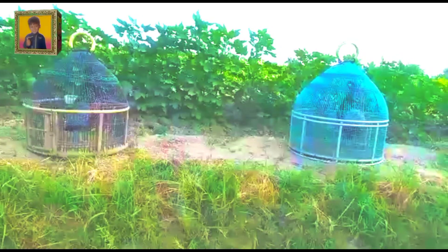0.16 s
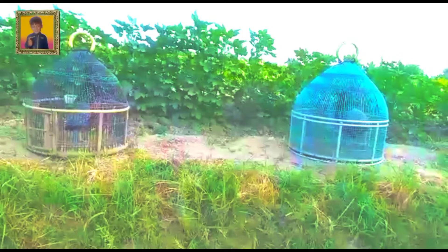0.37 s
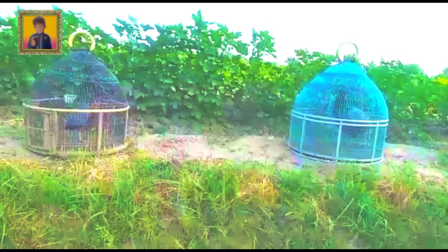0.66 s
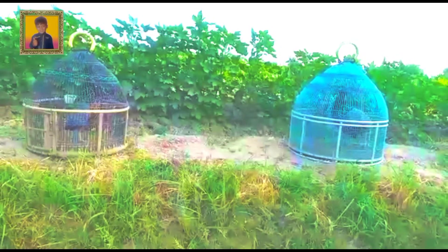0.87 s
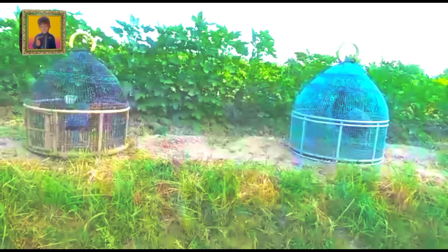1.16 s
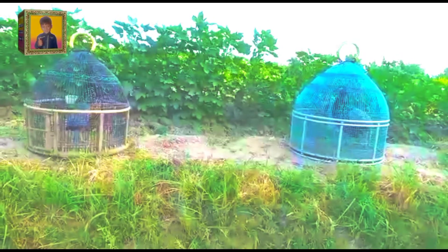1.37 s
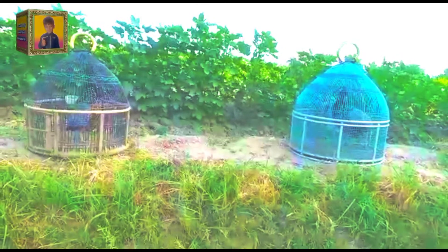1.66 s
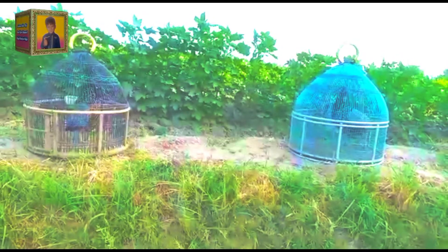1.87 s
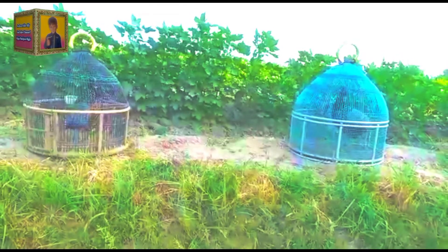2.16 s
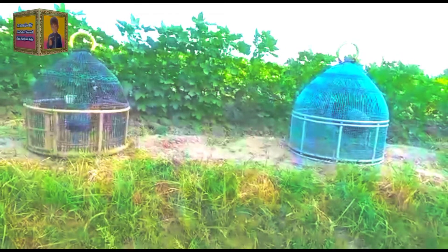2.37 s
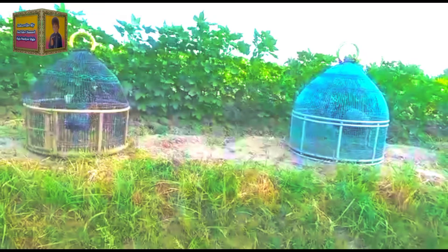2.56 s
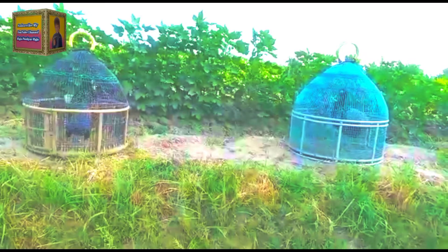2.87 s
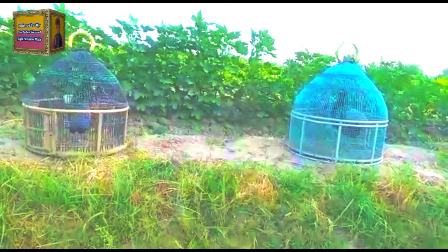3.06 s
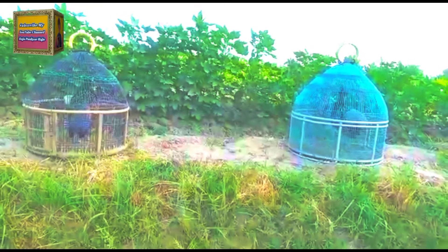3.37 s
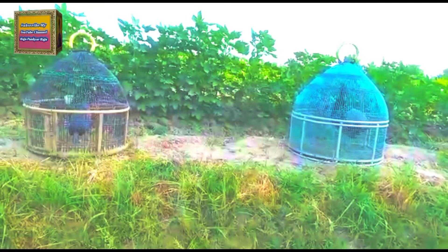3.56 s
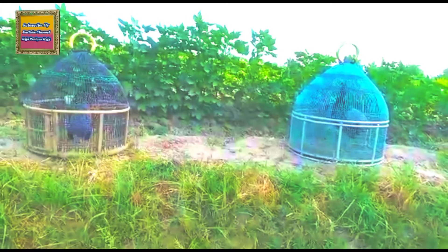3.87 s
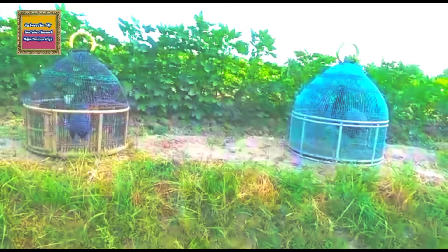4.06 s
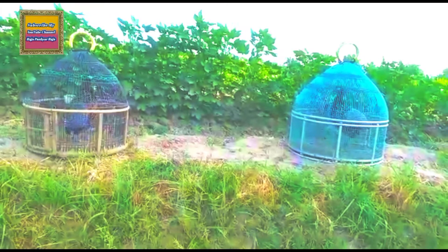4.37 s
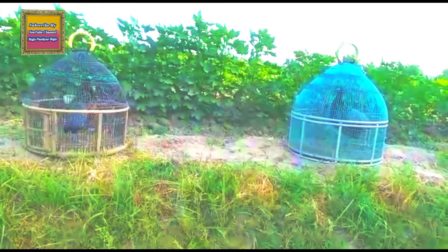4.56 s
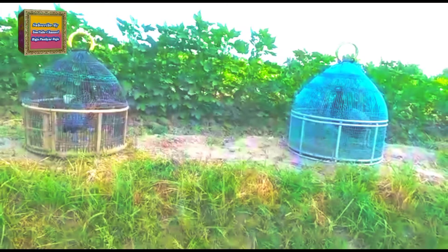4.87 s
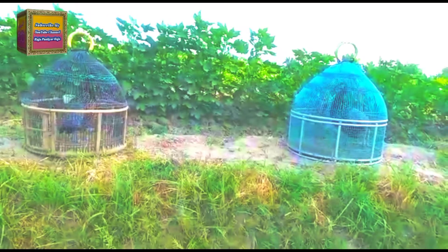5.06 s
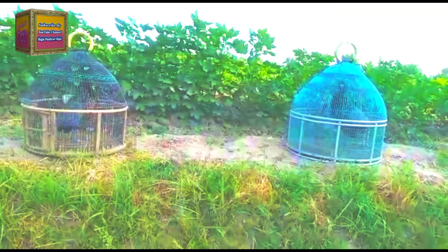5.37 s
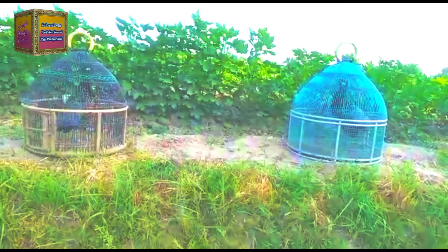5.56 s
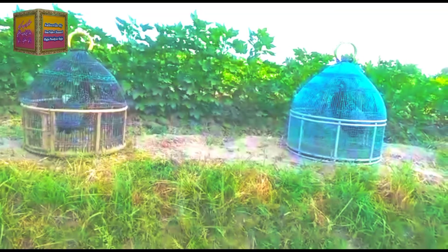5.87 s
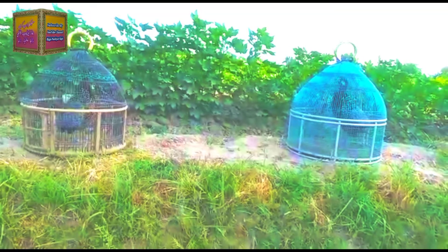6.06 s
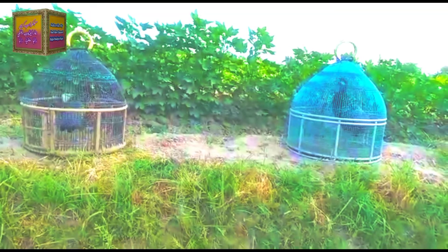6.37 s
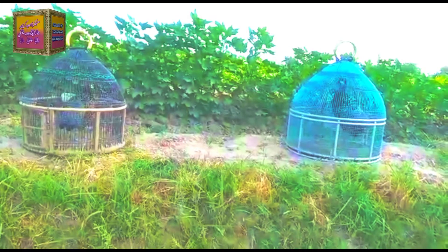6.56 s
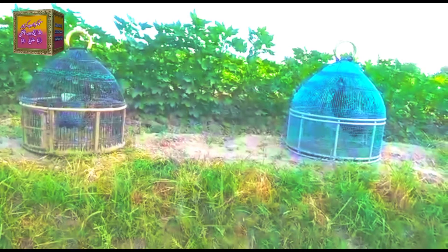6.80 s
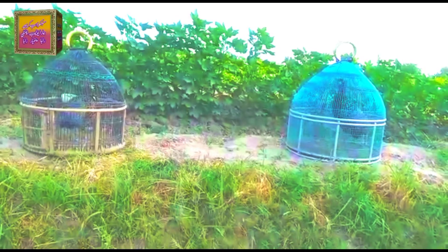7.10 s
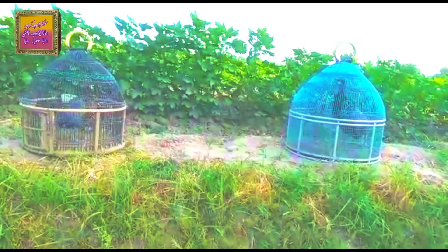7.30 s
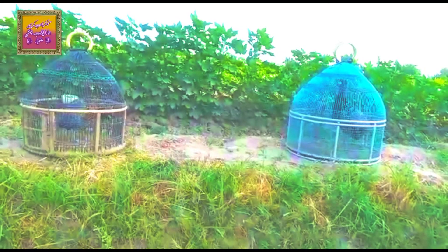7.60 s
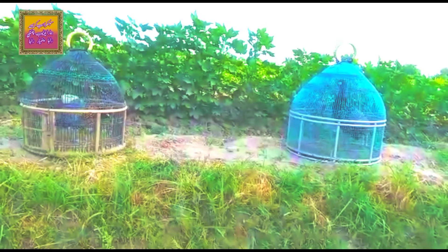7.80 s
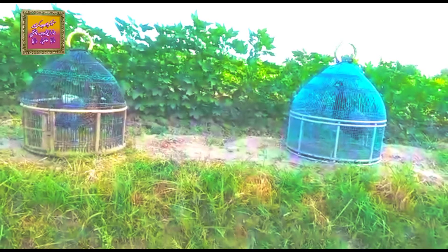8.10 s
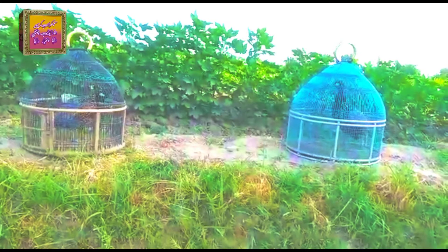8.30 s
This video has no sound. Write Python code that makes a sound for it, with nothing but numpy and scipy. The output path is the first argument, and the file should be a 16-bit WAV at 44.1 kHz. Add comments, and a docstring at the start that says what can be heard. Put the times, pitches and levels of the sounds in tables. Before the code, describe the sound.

Open field, close microphone. Low steady rumble and faint hiss, with a soft warbling distant bird early on. After two seconds a caged francolin snaps out a chirp leaping into a high whistle, then harsh rattling trills with short whistles between. About a second later another caged bird answers with the same pattern, higher and thinner. Small wind thumps touch the microphone during the first call; the background sinks under the calls and slowly returns.

```python
"""Two caged francolins call in turn in a field: a chirp, a held whistle, then grating trills with
short whistles between. Chirp, whistle and trill are one near-sinusoidal syrinx under different
pitch control; a trill is frequency modulation, the pitch dragged down 200 to 330 times a second.
Far birds are pairs of warbling voices; rumble, hiss, hums and wind puffs are filtered noise.
An automatic gain control lifts the quiet stretches, yields to each call and creeps back."""
import sys
import numpy as np
from scipy import signal
from scipy.io import wavfile
from scipy.ndimage import uniform_filter1d, minimum_filter1d

SR = 44100
rng = np.random.default_rng(int(sys.argv[2]) if len(sys.argv) > 2 else 0)


def generate_wav(signal):
    """Clip the signal to [-1, 1] and save it as 16-bit WAV at the path in sys.argv[1]."""
    frames = np.transpose(np.atleast_2d(signal))
    scaled = np.clip(frames, -1, 1) * 32767
    pcm = np.round(scaled).astype(np.int16)
    wavfile.write(sys.argv[1], SR, pcm)


N = 372197

# Spectrum of the distant rumble and hiss, relative. Columns: frequency_hz, density_db (per Hz)
FIELD_SPECTRUM = [(25, -23), (53, 2.5), (157, 2), (284, -8), (352, -14.5), (437, -21.5), (604, -27.5),
                  (1120, -34.5), (1550, -35), (2260, -37), (3130, -43.5), (8730, -53), (14600, -45.5),
                  (15800, -46.5)]
FIELD_DB = -43.5  # rms level

# Wind puffs on the microphone, level before the envelope. Columns: start_s, level_db
WIND_PUFFS = [(1.053, -41.5), (3.062, -34.5), (3.091, -30.5), (3.336, -22), (3.379, -20), (3.444, -21.5),
              (3.489, -26), (3.83, -30.5), (4.178, -36), (4.535, -36)]
# Spectrum of a puff, relative. Columns: frequency_hz, density_db (per Hz)
PUFF_SPECTRUM = [(30, -22.5), (70, -7), (130, -1.5), (250, -12.5), (420, -23.5), (700, -44), (1200, -78)]
PUFF_DECAY_S = 0.0457  # time for a puff to fall to 1/e

# Faint wavering tones and bands; width is that of the narrower filter.
# Columns: start_s, end_s, centre_hz, width_hz, level_db
HUM_BANDS = [(0, 8.44, 150, 12, -54), (1.93, 5.4, 237, 2.5, -50), (0, 8.44, 360, 4, -61.5),
             (4.8, 5.32, 105, 85, -44.5), (.95, 1.21, 1950, 60, -73), (0, 8.44, 3900, 480, -78),
             (7.55, 8.44, 1250, 640, -79.5), (2.33, 2.57, 3270, 50, -63), (7.03, 7.52, 2480, 70, -74),
             (7.03, 7.52, 3080, 90, -72), (7.55, 7.88, 1190, 40, -74), (8.1, 8.44, 1200, 25, -72)]

# Far birds, level before the fade. Columns: start_s, length_s, start_hz, end_hz, width_hz, level_db
FAR_BIRD_CALLS = [(0.0, 0.064, 2140, 2080, 302, -70.5), (0.194, 0.062, 2200, 2360, 300, -65),
                  (0.398, .08, 2170, 2030, 402, -65.5), (.35, 0.07, 1144, 1144, 80, -68),
                  (0.658, 0.062, 2487, 2350, 300, -71), (0.875, 0.036, 2300, 1780, 300, -65),
                  (1.199, 0.34, 2041, 1862, 647, -50), (1.504, .22, 1913, 1770, 411, -67.5),
                  (5.128, 0.1, 4293, 5347, 150.8, -74), (8.13, 0.03, 4500, 5200, 300, -72),
                  (8.165, 0.032, 5350, 4900, 302, -71), (8.22, .025, 4360, 5000, 300, -77),
                  (8.247, .05, 5050, 4950, 300, -73), (1.109, 0.05, 1320, 1086, 300, -64)]
FAR_WARBLES_PER_S, FAR_SLOWING_PER_S = 84, .55  # starting warble rate; share of it lost per second
FAR_GAP, FAR_DEPTH = 0.29, 0.22  # shares of the width: half the gap between voices, warble depth
FAR_FADING_DB, FAR_BREATH_DB, FAR_OCTAVE_DB = -4.5, -6.5, -27.5  # fade by the end; breath; second harmonic

# Spectral colour of the near birds through beak, cage and microphone. Columns: frequency_hz, gain_db
NEAR_COLOUR = [(700, -36), (1100, -22.5), (1550, -9), (2300, -17.5), (2800, -2), (3400, -2), (4200, 4.5),
               (5100, -2), (6000, -16), (6600, -27), (7500, -28.5), (8600, -27), (9600, -20),
               (11000, -13.5), (13500, -12.5), (15500, -14)]

# Falling chirps, pitches before the sag; the last row is the other side of the syrinx.
# Columns: start_s, length_s, first_pitch_hz, last_pitch_hz, step_middle_s, step_time_s, level_db,
#          second_harmonic_db
CHIRP_NOTES = [(2.26, 0.038, 2796, 1846, .0065, 0.0019, -2.5, -13),
               (5.285, 0.031, 3048, 1756, .0135, .0024, -6.5, -16.5),
               (5.288, 0.018, 4130, 4300, .008, .001, -9.5, -18)]
CHIRP_SAG_PER_S = 5.5  # share of the pitch lost per second
CHIRP_ARCH_DB, CHIRP_EDGE_S, CHIRP_EDGE_DB = -7.5, 0.0033, -20  # arch at both ends; extra edge ramps

# Held whistles. Columns: start_s, hold_s, leap_from_hz, held_pitch_hz, level_db, second_harmonic_db,
#          snap_db (extra level of leap and collapse)
WHISTLE_NOTES = [(2.3, .027, 1484, 5853, -0.7, -15.5, -2.5), (3.32, 0.022, 5040, 6160, -8.5, -26, 5.7),
                 (3.924, 0.015, 5500, 6300, -9, -22.5, -2.2), (5.326, .0332, 1857, 7220, -9.5, -9, 6),
                 (6.305, 0.027, 6770, 7310, -14, -14.5, 2), (6.913, 0.02, 6840, 7100, -13.5, -9, 4)]
LEAP_S, DROP_S, DROP_HZ = 0.0017, 0.0012, 1500  # time constants of leap and collapse; pitch it falls to
LET_GO_S, LET_GO_DB = .011, -29.5  # length of the release and its level change

# Grating trills, one list a bird. Columns: start_s, length_s, level_db, swell_s,
#          sag_db (over the length), fade_s, first_dips_per_s, settled_dips_per_s (before slowing)
TRILL_NOTES = [
    [(2.801, 0.15, -7.5, .004, -3.2, 0.013, 257, 285), (3.14, .181, -8, 0.036, -3.5, 0.00097, 308, 284),
     (3.343, .025, -14.5, .002, -0.5, 0.022, 280, 270), (3.675, 0.1, -7, 0.038, -2.5, .018, 290, 268),
     (3.848, 0.08, -9, 0.032, -0.4, 0.0043, 280, 303), (3.941, .07, -9, .006, -2, 0.028, 280, 320)],
    [(5.784, 0.17, -8, 0.0047, -4, 0.024, 277, 258), (6.134, .171, -8, 0.0213, -5, .002, 320, 277),
     (6.327, .036, -15, .002, -1.5, .016, 220, 280), (6.657, 0.1, -9.5, .02, 0, 0.028, 290, 303),
     (6.826, 0.086, -7.5, 0.024, -2.5, .002, 270, 310), (6.93, 0.092, -9.5, 0.0028, -9.5, 0.011, 268, 330)],
]
# Each bird's voice. Columns: resting_pitch_hz (once tightened), lowest_pitch_hz (at full effort),
#          early_drop_hz (extra drop at the start), rebound (in mid-dip, at full effort, 0-1),
#          dip_share (of the cycle, 0-1), loud_half_width (of the cycle, 0-1),
#          loss_db (away from mid-dip), second_harmonic_db, third_harmonic_db,
#          breath_db (before the loudness swing), treble_db (from 12500 Hz up)
BIRD_VOICES = [(6044, 2749.5, 460, 0.83, 0.78, 0.33, -7, -14, -32.5, -18.5, -8.5),
               (7386, 3365, 600, 0.05, 0.76, 0.36, -9, -13.5, -14, -21, 1.5)]
SWELL_DB, FADE_DB = -16.5, -15  # change of level at the very start and the very end
SETTLE_S = .04  # time constant of the dip rate
SLOWING, SLOWING_LEAD = .17, 2.8  # share of the rate lost by the end; begins this many fades early
TIGHTEN_S = 0.065  # time constant of muscle tightening
LOOSE_START, LOOSE_WEAK = 0.12, 0.072  # shares lost from the resting pitch: at the start, at weak effort

# Single reflection off the other cage. Columns: delay_s, level_db
CAGE_ECHOES = [(0.0095, -14.5)]
# Tails of near scatter, hedge and far tree line, level before colouring. Columns: t60_s, level_db
SCATTER_TAILS = [(.1, -15.5), (.3, -29), (1.3, -45)]
BAND_EDGE_HZ = 15800  # upper limit of the whole sound


def gain_of(db):
    """Decibel law: 20 dB is a tenfold amplitude."""
    return 10 ** (np.asarray(db) / 20)


def evened(x):
    """Normalization of power to rms 1."""
    return x / np.sqrt(np.mean(x ** 2) + 1e-20)


def noise(n):
    """White noise: independent Gaussian samples, drawn in whole blocks."""
    return rng.standard_normal((n // 16384 + 1) * 16384)[:n]


def drift(n, size):
    """Random wander: noise averaged twice over size samples, at rms 1."""
    return evened(uniform_filter1d(uniform_filter1d(noise(n), size), size))


def add(mix, start_s, sound):
    """Superposition: pressures sum from the start time on."""
    part = mix[max(round(start_s * SR), 0):][:len(sound)]
    part += sound[:len(part)]


def shaped(x, points):
    """Minimum-phase filtering: a (Hz, dB) spectrum with the causal phase that belongs to it."""
    f, db = np.transpose(points)
    bins_hz = abs(np.fft.fftfreq(8192, 1 / SR)) + 1
    log_gain = np.log(gain_of(np.interp(np.log(bins_hz), np.log(f), db)))
    response = np.exp(np.conj(signal.hilbert(log_gain)))
    taps = np.fft.ifft(response).real[:4096]
    return signal.oaconvolve(x, taps)[:len(x)]


def resonate(x, hz, width):
    """Resonance by heterodyning: shift the pitch hz to zero, smooth, and shift back."""
    turn = np.exp(2j * np.pi * np.cumsum(hz * np.ones(len(x))) / SR)
    r = np.exp(-np.pi * width / SR)
    return 2 * (turn * signal.lfilter([1 - r], [1, -r], x / turn)).real


def field():
    """Random-phase noise: distant rumble and hiss, with levels wandering by patch and in the bass."""
    frames, hz = N // 256 + 5, np.fft.rfftfreq(1024, 1 / SR)
    a, b, patches = rng.standard_normal((frames, 513, 3)).T
    patches = uniform_filter1d(patches, size=10, axis=0)  # over frequency
    patches = evened(uniform_filter1d(patches, size=12, axis=1))  # over time
    bass = np.clip(1 - hz / 600, 0, 1)[:, None]
    lumps_db = 0.73 * drift(frames, size=6) * bass
    spectrum = (a + 1j * b) * gain_of(2.3 * patches + lumps_db)
    hiss = signal.istft(spectrum, nperseg=1024, noverlap=768)[1][:N]
    return gain_of(FIELD_DB) * evened(shaped(hiss, FIELD_SPECTRUM))


def hums():
    """Narrow-band noise: a resonance turns noise into a wavering tone, faded in and out."""
    out = np.zeros(N)
    for start, end, hz, width, db in HUM_BANDS:
        n = round((end - start) * SR)
        band = resonate(resonate(noise(n), hz, width), hz, 3 * width)
        add(out, start, gain_of(db) * evened(band) * signal.windows.tukey(n, min(4000 / n, 1)))
    return out


def wind():
    """Turbulent pressure: short puffs of low noise with a quick rise and a Gaussian decay."""
    out, u = np.zeros(N), np.arange(8000) / SR / PUFF_DECAY_S
    envelope = np.minimum(8 * u, 1) * np.exp(-u ** 2)
    for start, db in WIND_PUFFS:
        puff = evened(shaped(rng.standard_normal(12000), PUFF_SPECTRUM)[4000:])  # settled part
        add(out, start, gain_of(db) * puff * envelope)
    return out


def syrinx(hz, second_db, third_db):
    """Harmonic series: a near sine with two overtones, each silent from 20 kHz up."""
    turn = 2 * np.pi * np.cumsum(hz) / SR
    harmonics = ((1, 0.003), (2, second_db), (3, third_db))
    return sum(gain_of(db) * np.sin(k * turn) * (k * hz < 20000) for k, db in harmonics)


def far_birds():
    """Frequency modulation: two close voices glide and warble together, with breath in their band."""
    out = np.zeros(N)
    for start, length, start_hz, end_hz, width, db in FAR_BIRD_CALLS:
        t = np.arange(0, length, 1 / SR)
        hz = np.linspace(start_hz, end_hz, len(t))
        warble_rate = FAR_WARBLES_PER_S * (1 - FAR_SLOWING_PER_S * t)
        warble = np.sin(2 * np.pi * np.cumsum(warble_rate) / SR)
        voices = 0
        for side in (-1, 1):
            voice_hz = hz + width * (side * FAR_GAP + FAR_DEPTH * warble)
            voices = voices + syrinx(voice_hz, FAR_OCTAVE_DB, FAR_OCTAVE_DB - 8)
        breath = evened(resonate(resonate(noise(len(t)), hz, width), hz, width))
        level = gain_of(db + FAR_FADING_DB * (t / length) ** 2) * signal.windows.tukey(len(t), .3)
        add(out, start, level * evened(voices + gain_of(FAR_BREATH_DB) * breath))
    return out


def clear_note(hz, level_db, second_db, tremble, flutter_db, breath_db):
    """Voiced tone with breath: a gliding note with random tremble in pitch and flutter in level."""
    n = len(hz)
    tone = syrinx(hz * (1 + tremble * drift(n, size=20)), second_db, second_db - 6.5)
    tone = tone * gain_of(flutter_db * drift(n, size=60)) + gain_of(breath_db) * noise(n)
    return gain_of(level_db) * tone * signal.windows.tukey(n, min(.001 * SR / n, 1))


def chirp(start, length, first_hz, last_hz, middle, step_s, top_db, second_db):
    """Pitch glide: one smooth step while the whole pitch sags; the level arches."""
    t = np.arange(0, length, 1 / SR)
    unstepped = (1 - np.tanh((t - middle) / (2 * step_s))) / 2
    hz = (last_hz + (first_hz - last_hz) * unstepped) * (1 - CHIRP_SAG_PER_S * t)
    edge = np.clip(1 - np.minimum(t, length - t) / CHIRP_EDGE_S, 0, 1)
    level_db = top_db + CHIRP_ARCH_DB * (2 * t / length - 1) ** 2 + CHIRP_EDGE_DB * edge
    return start, clear_note(hz, level_db, second_db, tremble=0.034, flutter_db=3.0, breath_db=-16)


def whistle(start, hold, from_hz, held_hz, held_db, second_db, snap_db):
    """Exponential relaxation of pitch: leap, hold, collapse; the level shifts while off the hold."""
    t = np.arange(0, hold + LET_GO_S, 1 / SR)
    after = np.maximum(t - hold, 0)
    leap_hz = held_hz - (held_hz - from_hz) * np.exp(-t / LEAP_S)
    hz = DROP_HZ + (leap_hz - DROP_HZ) * np.exp(-after / DROP_S)
    off_hold = np.clip(4 * (1 - hz / held_hz), 0, 1)  # full from a quarter below the held pitch
    level_db = held_db + snap_db * off_hold + LET_GO_DB * after / LET_GO_S
    return start, clear_note(hz, level_db, second_db, tremble=0.0057, flutter_db=2.5, breath_db=-21)


def trill(voice, start, length, held_db, swell, sag_db, fade, first_dips, dips):
    """Periodic modulation: each cycle drags the pitch down and lets it go, loudest in mid-dip."""
    (top_hz, low_hz, early_hz, rebound, share, loud, loss_db,
     second_db, third_db, breath_db, treble_db) = voice
    t = np.arange(0, length, 1 / SR)
    n = len(t)
    ending = 1 - (length - t) / max(fade, 1 / SR)  # 0 where the fade begins, 1 at the end
    swell_db = SWELL_DB * np.clip(1 - t / max(swell, 1 / SR), 0, 1) ** 2
    fade_db = FADE_DB * np.clip(ending, 0, 1) ** 0.76
    level_db = held_db + swell_db + sag_db * t / length + fade_db

    # weak effort: deeper, rougher dips
    slack = np.clip((level_db.max() - 2 - level_db) / 12., 0, 1)
    rough = .07 + .14 * slack
    rate = dips + (first_dips - dips) * np.exp(-t / SETTLE_S)
    rate = rate * (1 - SLOWING * np.clip(1 + (ending - 1) / SLOWING_LEAD, 0, 1))
    cycle = np.cumsum(rate * (1 + .5 * rough * drift(n, size=150))) / SR % 1
    u = np.clip((cycle - .5) / min(share, 1), -.5, .5)  # place within the dip
    bounce = rebound * (1 - 0.65 * slack) * np.exp(-(u / 0.18) ** 2)
    dip = np.cos(np.pi * u) ** .55 - bounce
    dip = uniform_filter1d(dip, size=9) / dip.max()

    # the first dips go deepest, then the muscles tighten
    loose = np.exp(-t / TIGHTEN_S)
    bottom_hz = low_hz - early_hz * loose - 1500 * slack
    top_hz = top_hz * (1 - LOOSE_START * loose - LOOSE_WEAK * slack)
    jitter = .3 * rough * drift(n, size=30) + .01 * drift(n, size=700)
    hz = (top_hz - (top_hz - bottom_hz) * dip) * (1 + jitter)

    away_db = loss_db * (2 - np.exp(-((cycle - .5) / loud) ** 6))
    swing = gain_of(away_db + 21 * rough * drift(n, size=80))
    tone = swing * syrinx(hz, second_db, third_db)
    tone = tone + np.sqrt(swing) * gain_of(breath_db) * noise(n)
    tone = shaped(tone, [(9000, 0.0065), (12500, treble_db)])
    heard = np.sqrt(np.mean(shaped(tone, NEAR_COLOUR) ** 2))  # rms once coloured
    edges = signal.windows.tukey(n, min(0.0025 * SR / n, 1))
    return start, gain_of(level_db) * tone / heard * edges


def francolins():
    """Source and filter: the notes of both caged birds pass through one spectral colour."""
    out = np.zeros(N)
    for rows, voice in zip(TRILL_NOTES, BIRD_VOICES):
        for row in rows:
            add(out, *trill(voice, *row))
    for rows, note in ((CHIRP_NOTES, chirp), (WHISTLE_NOTES, whistle)):
        for row in rows:
            add(out, *note(*row))
    return shaped(out, NEAR_COLOUR)


def outdoors(x):
    """Reflection and scattering: one distinct echo and sparse random taps with decaying tails."""
    t, taps = np.arange(SR) / SR, np.zeros(SR)
    at = np.arange(320, SR - 20, 20)
    taps[at + rng.integers(0, 20, len(at))] = rng.choice([-1., 1.], len(at))
    tail = np.zeros(SR)
    for t60, db in SCATTER_TAILS:
        decay = taps * gain_of(-60 * t / t60)
        tail += gain_of(db) * decay / np.linalg.norm(decay)
    # thin in the bass, fullest near 7 kHz
    tail = shaped(tail, [(1200, -11.5), (3000, -6.0), (7000, 1.5), (15000, -1.5)])
    for delay, db in CAGE_ECHOES:
        tail[round(delay * SR)] += gain_of(db)
    return x + signal.fftconvolve(x, tail)[:N]


def scene():
    """Superposition: birds with their reflections over field, hums and wind."""
    birds = outdoors(francolins() + far_birds())
    return (birds + field() + hums() + wind())[None]


def record(dry):
    """Automatic gain control: bass cut, lift that yields to loud sound, limiter, band limit."""
    dry = signal.sosfilt(signal.butter(4, 42, "highpass", fs=SR, output="sos"), dry)
    power_db = 10 * np.log10(abs(uniform_filter1d(dry[0] ** 2, size=1500)) + 1e-12)
    loud = uniform_filter1d(np.clip((power_db + 28.5) / 18.7, 0, 1), size=2000)
    creep = np.arange(N) * 0.25 / SR  # share of the lift regained a second
    duck = np.maximum(np.maximum.accumulate(loud + creep) - creep, 0)
    lifted = dry * gain_of(11.4 * (1 - duck))
    room = minimum_filter1d(1 / np.maximum(abs(lifted), 1), size=90)  # gain that keeps peaks at full scale
    limited = lifted * uniform_filter1d(room, size=45)
    low_pass = signal.firwin(511, BAND_EDGE_HZ, window=("kaiser", 9), fs=SR)
    return signal.oaconvolve(limited, low_pass[None], "same")


dry = scene()
out = record(dry)
generate_wav(out)
```